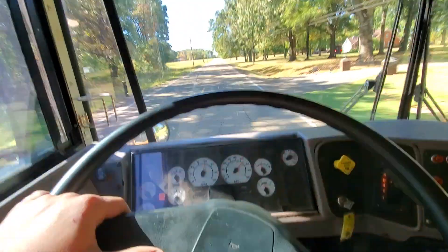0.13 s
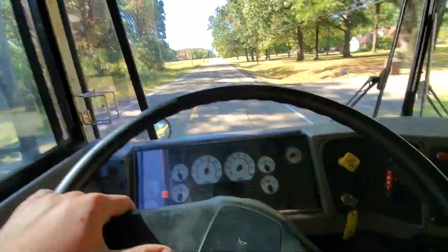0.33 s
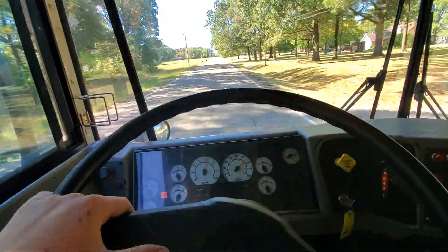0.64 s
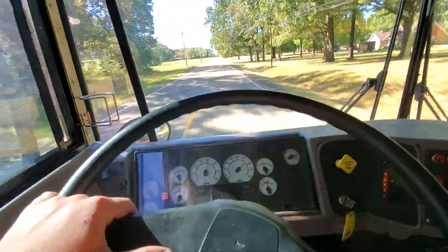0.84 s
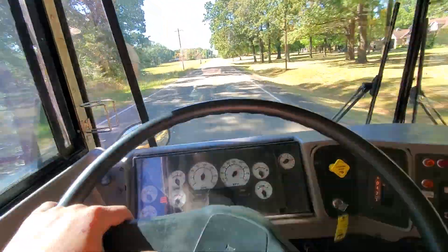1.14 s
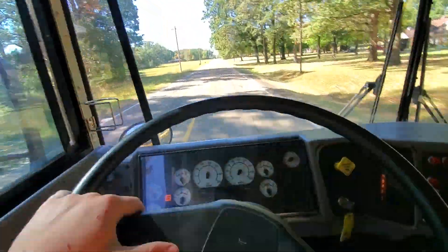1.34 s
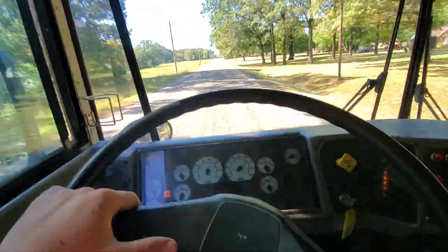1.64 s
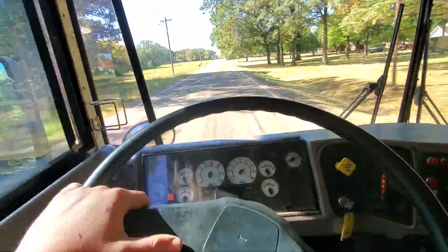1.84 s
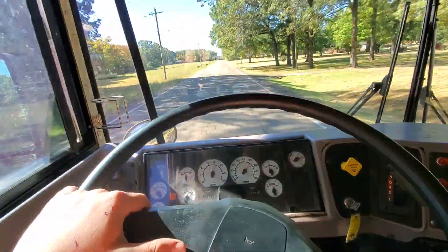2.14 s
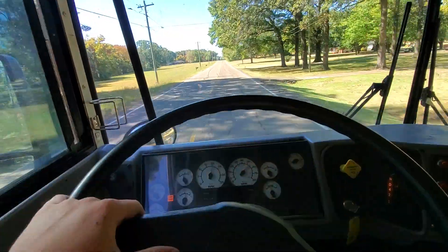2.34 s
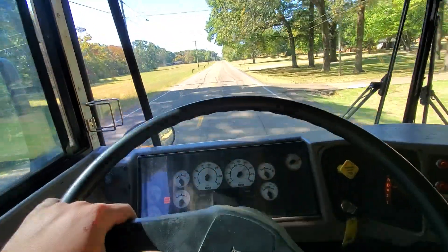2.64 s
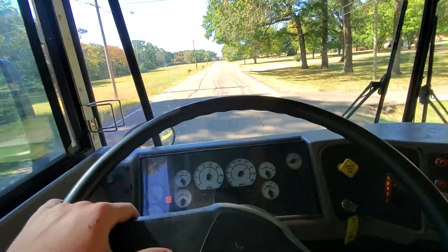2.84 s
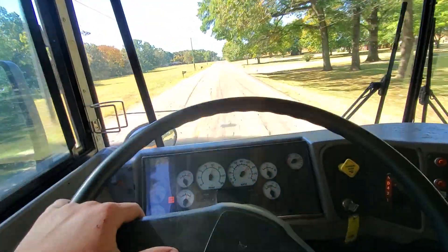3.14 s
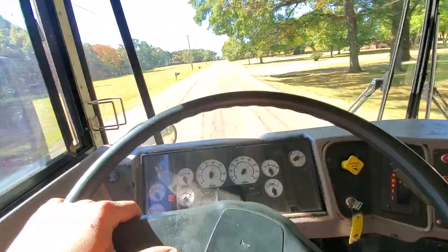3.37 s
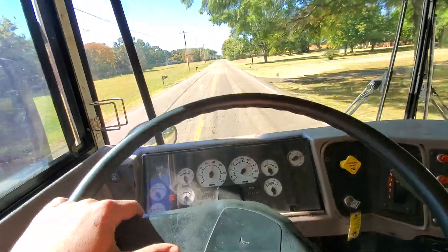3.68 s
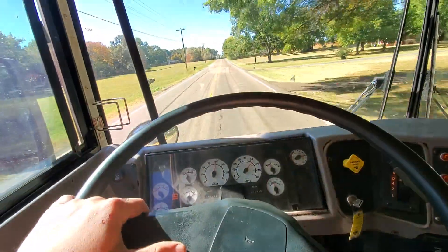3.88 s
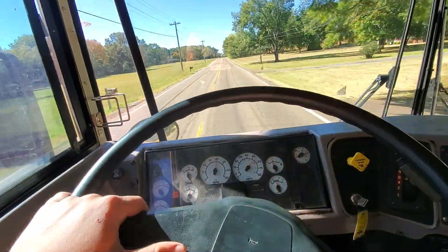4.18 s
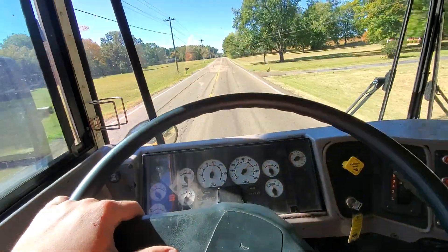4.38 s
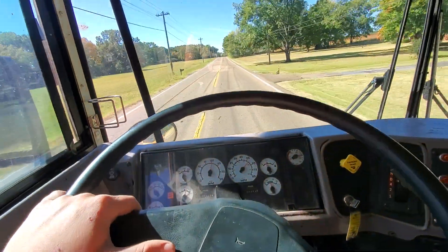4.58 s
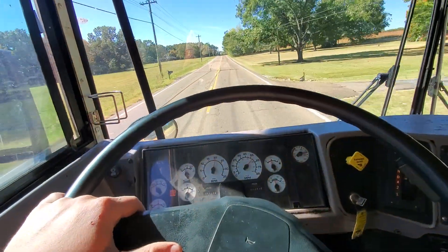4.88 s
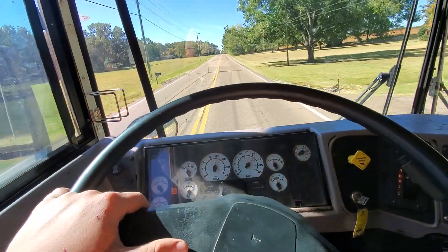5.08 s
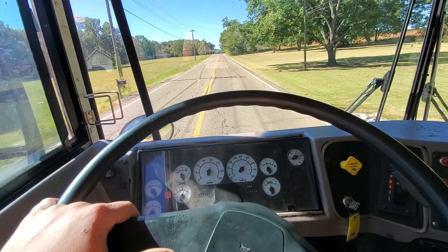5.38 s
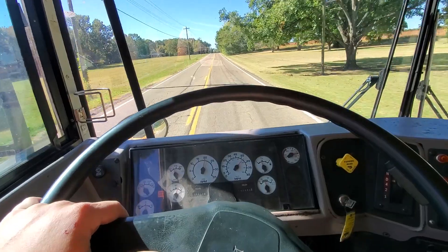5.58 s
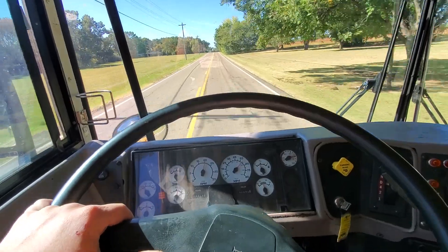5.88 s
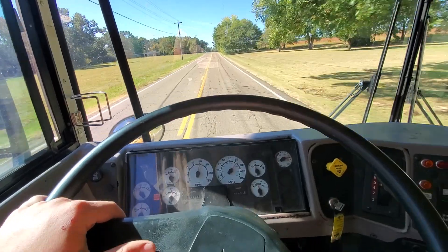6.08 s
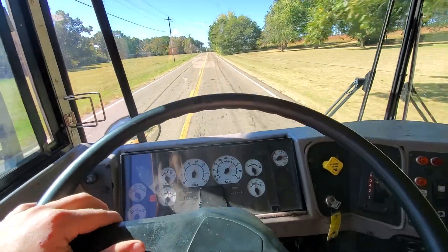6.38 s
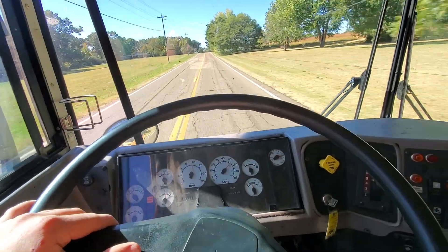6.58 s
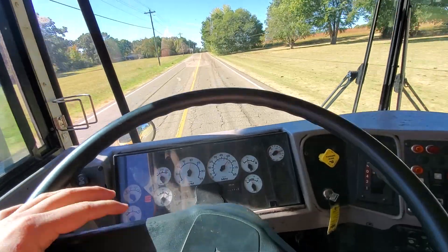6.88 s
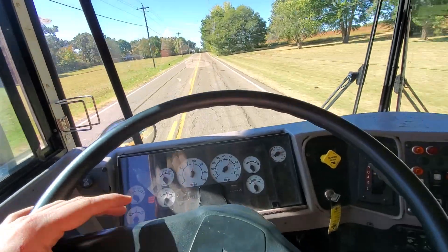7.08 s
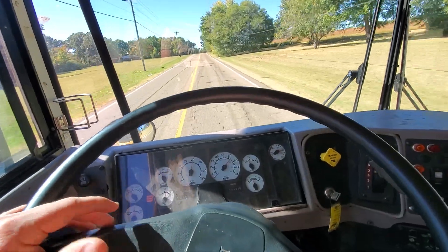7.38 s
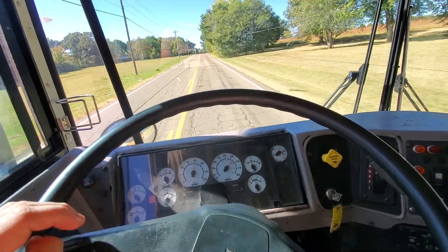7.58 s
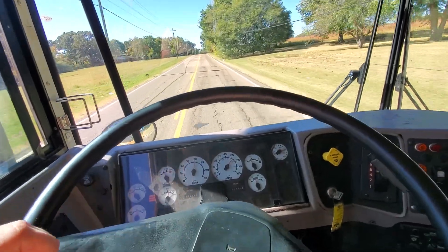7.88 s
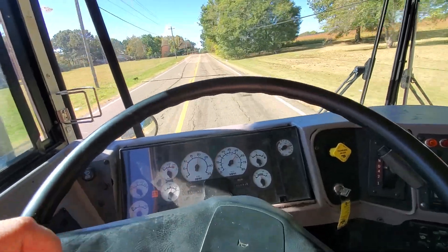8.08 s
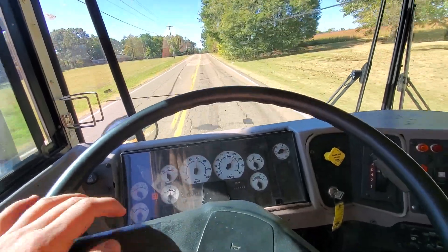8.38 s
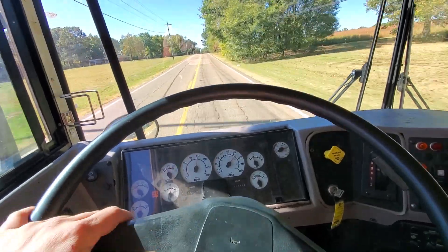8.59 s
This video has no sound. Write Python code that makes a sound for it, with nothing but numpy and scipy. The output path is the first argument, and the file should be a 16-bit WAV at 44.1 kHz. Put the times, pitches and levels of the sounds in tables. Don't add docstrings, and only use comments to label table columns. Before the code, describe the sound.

A heavy diesel engine hums and beats steadily from the driver's seat while the bus body booms over bumps and loose windows rattle and squeak.

```python
import sys
import numpy as np
from scipy import signal
from scipy.fft import rfft, irfft, next_fast_len
from scipy.io import wavfile
from scipy.ndimage import uniform_filter1d

SR = 44100
rng = np.random.default_rng(int(sys.argv[2]) if len(sys.argv) > 2 else 0)


def linear_from_db(decibels):
    return 10 ** (np.asarray(decibels, float) / 20)


def store_wav(level_fs):
    pcm = np.round(np.clip(np.atleast_2d(level_fs), -1, 1) * 32767)
    wavfile.write(sys.argv[1], SR, pcm.T.astype(np.int16))


N = 384548
TIME = np.arange(N) / SR
PADDED = next_fast_len(N)
FREQ = np.arange(PADDED // 2 + 1) * SR / PADDED

# (frequency [Hz], left [dB/Hz], right [dB/Hz], likeness [-1..1])
KNOCK_COLOUR = [(1400, -87, -87, -.4), (1900, -76, -76, -.3), (2250, -74.5, -75, .25),
                (2650, -72, -72.5, .1), (3000, -73, -71.5, .1), (3400, -71, -69.5, 0), (3700, -73, -71, 0),
                (3850, -76.5, -71.5, .1), (4600, -79.5, -74, 0), (5500, -82.5, -77, 0),
                (6750, -81.5, -77.5, 0), (7200, -90, -84.5, 0), (8000, -103, -99, 0), (9000, -125, -125, 0)]


def level(x, db):
    return x * linear_from_db(db) / np.sqrt(np.mean(x ** 2))


def curves(table):
    s, *columns = np.transpose(table)
    return [np.interp(TIME, s, c) for c in columns]


def walk(rate_hz):
    hold = int(SR / rate_hz)
    x = np.repeat(rng.standard_normal(N // hold + 1), hold)[:N]
    x = uniform_filter1d(uniform_filter1d(x, hold), hold)
    return x / x.std()


def hiss():
    return rng.standard_normal((2, N))


def swells(events, rest_db, width_s):
    coarse_s = TIME[::64]
    power = linear_from_db(2 * rest_db)
    for s, peak_db in events:
        power = power + linear_from_db(2 * peak_db) * np.exp(-((coarse_s - s) / width_s) ** 2)
    return np.interp(TIME, coarse_s, 10 * np.log10(power))


def steadied(x, db):
    swell = uniform_filter1d(uniform_filter1d(np.mean(x ** 2, axis=0), size=3000), size=3000)
    return level(x / swell ** .24, .4) * linear_from_db(db)


def coloured(colour, pair, lead_s=0.):
    # (frequency [Hz], width [Hz], left boost [dB], right boost [dB])
    panels = [(1100, 40, 3, 1), (1290, 40, 2, 4), (1390, 55, 4, 0), (1585, 70, 3, 3), (1920, 90, 4, -1),
              (2470, 50, 3, 0), (2590, 50, 3, 4), (2655, 45, 2, 3), (2725, 60, 6, -1), (2872, 50, -1, 6),
              (2985, 40, -1, 6), (3078, 50, 4, 6), (3150, 40, 1, 3), (3305, 60, 3, 7.5), (3370, 90, 4, 1),
              (3500, 50, 1, 3), (3632, 40, 3, 0), (3945, 70, 0, 4), (5610, 100, 0, 4), (6020, 70, 1, 2),
              (6400, 130, 3, 3)]
    hz, *columns = np.transpose(colour)
    left_db, right_db, like = (np.interp(np.log(FREQ + 1), np.log(hz), c) for c in columns)
    tint_db = np.array([left_db, right_db])
    for panel_hz, width_hz, *boost_db in panels:
        tint_db += np.outer(boost_db, np.exp(-(2 * (FREQ - panel_hz) / width_hz) ** 2))
    like = np.clip(like, -1, 1)
    common, apart = rfft(pair, PADDED) * np.sqrt([1 + like, 1 - like])
    early = np.exp(2j * np.pi * FREQ * lead_s)
    left, right = (common + apart) * early, common - apart
    return irfft(np.array([left, right]) * linear_from_db(tint_db), PADDED)[:, :N]


def engine_tones(turns, hum_turns, drone_db, hum_db):
    # (multiple of cycle rate, left [dB], right [dB], left lead [rad])
    orders = [(9, -37, -39, -1.0), (12, -41, -42, 0.2), (15, -44, -50, -0.1), (16, -43, -44, 0.3),
              (18, -46, -44, 0.3), (20, -54, -45, 0.3), (23, -50, -54, 0.2), (30, -52, -46, -0.4),
              (32, -54, -58, 2.0), (34, -57, -58, -0.3), (36, -52, -49, 1.7), (39, -52, -62, 0.0),
              (46, -58, -56, 0.7), (48, -58, -55, -0.3), (50, -57, -64, 0.4), (54, -54, -55, -0.1),
              (56, -47.5, -55.5, -0.8), (60, -55, -66, -1.7), (66, -58, -58, -2.9)]
    hum_ahead_turns = .386
    lead_rad, side_db = np.array([[.2], [0]]), np.array([[.45], [-.55]])
    out = linear_from_db(drone_db + side_db) * np.sin(2 * np.pi * 6 * turns + lead_rad)
    out += linear_from_db(hum_db + side_db) * np.sin(2 * np.pi * (hum_turns + hum_ahead_turns) + lead_rad)
    for order, left_db, right_db, left_lead_rad in orders:
        order_db = np.array([[left_db], [right_db]]) + 1.3 + 1.2 * walk(3)
        angle = 2 * np.pi * (order * turns + rng.random())
        out += linear_from_db(order_db) * np.sin(angle + np.array([[left_lead_rad], [0]]))
    return np.sqrt(2) * out


def road(thud_db, boom_db, roar_db):
    # (frequency [Hz], left [dB/Hz], right [dB/Hz], likeness [-1..1])
    boom_colour = [(12, -66, -66, .98), (25, -59, -59, .98), (33, -39, -39.5, .98), (52, -34, -35, .98),
                   (62, -36, -37, .98), (72, -32, -33, .98), (86, -37, -38, .98), (105, -44, -45, .98),
                   (118, -45, -46, .96), (128, -56, -57, .9), (150, -75, -75, .9), (250, -140, -140, .9)]
    # (frequency [Hz], left [dB/Hz], right [dB/Hz], likeness [-1..1])
    roar_colour = [(100, -70, -70, .9), (130, -54, -56, .85), (190, -49, -50, .9), (260, -53, -55, .88),
                   (360, -58, -58, .8), (500, -61, -60, .55), (620, -64, -66, .1), (760, -63, -66, .35),
                   (890, -65, -66, .5), (1050, -67, -68, -.1), (1350, -68, -70, -.5), (1800, -74, -74, -.4),
                   (2600, -92, -92, 0), (4000, -140, -140, 0)]
    rumble = coloured(boom_colour, hiss(), lead_s=.0004)
    thud = signal.sosfiltfilt(signal.butter(4, 60, fs=SR, output="sos"), rumble)
    boom = rumble - thud
    roar = level(coloured(roar_colour, hiss(), lead_s=.0001), .15) * linear_from_db(roar_db)
    return steadied(thud, thud_db - .7) + steadied(boom, boom_db + .3) + roar


def knock(turns, knock_db):
    repeat, puff = .4, .3
    steady = .6
    cylinder_db = np.array([0, -7, -2, -9, -3, -6])
    firing = 6 * turns
    blow = linear_from_db(cylinder_db[firing.astype(int) % 6]) * np.exp(-(firing % 1) / .6)
    pattern = uniform_filter1d(rng.standard_normal((2, 2624)), size=6)
    steps = pattern.shape[1]
    place = (turns % 1) * (steps - 1)
    same = np.array([np.interp(place, np.arange(steps), p) for p in pattern])
    drive = level(same * (blow + steady), 0) * repeat
    drive += hiss() * (1 + puff * blow) * linear_from_db(.55 * walk(7))
    return level(coloured(KNOCK_COLOUR, drive), 3.54) * linear_from_db(knock_db)


def windows(buzz_db):
    # (time [s], peak [dB])
    rattles = [(0.3254, -61), (0.3875, -36), (0.4474, -38), (1.2914, -37), (1.7699, -41), (2.2238, -37),
               (2.3181, -36), (2.3965, -35), (2.4224, -30), (3.6664, -39), (5.1053, -34), (5.2634, -40),
               (5.4201, -29), (5.4534, -39), (5.7094, -39), (5.8596, -36), (5.9164, -38), (6.1164, -38),
               (6.4308, -29), (6.5934, -38), (6.6687, -37), (6.8932, -35), (7.0524, -34), (7.1546, -30),
               (7.2863, -40), (7.7917, -42), (8.0137, -33), (8.4404, -37), (8.5185, -36), (8.5999, -38)]
    # (time [s], peak [dB], frequency [Hz])
    squeaks = [
        (0.4479, -47, 13450),
        (5.8596, -42, 13450),
        (6.1135, -45, 13450),
        (6.5031, -41, 13450),
        (6.5949, -45, 13450),
        (7.5448, -50, 13450),
    ]
    # (frequency [Hz], left [dB/Hz], right [dB/Hz], likeness [-1..1])
    buzz_colour = [(5000, -125, -125, 0), (7000, -101, -102, 0), (8000, -96.5, -98, .15),
                   (9000, -93, -96, 0), (9800, -92, -94.5, 0), (10200, -90.5, -92, 0), (10600, -88, -88, 0),
                   (12000, -89, -88.5, 0), (14000, -87, -89.5, 0), (16000, -85, -89.5, 0)]
    rise_s, fall_s, swell_s = .0012, .0065, .005
    ticks_per_s, tick_db, tick_spread_db, tick_s = 18, 1, 2.2, .003
    shake = linear_from_db(buzz_db - 1.5 + 1.9 * walk(35))
    after_s = TIME[:3000]
    span = len(after_s)
    rattle, squeak = np.zeros((2, N + span))
    hit = np.exp(-after_s / fall_s) * (1 - np.exp(-after_s / rise_s))
    for s, peak_db in rattles:
        start = int(s * SR)
        rattle[start:start + span] += linear_from_db(peak_db - 7.5) * hit
    swell = after_s / swell_s * np.exp(1 - after_s / swell_s)
    for s, peak_db, hz in squeaks:
        start = int(s * SR)
        squeak[start:start + span] += linear_from_db(peak_db - 6.5) * swell * np.sin(2 * np.pi * hz * after_s)
    rattle, squeak = rattle[:N], squeak[:N]
    chance, size = rng.random(N), rng.exponential(size=N)
    ticks = (chance < ticks_per_s / SR) * linear_from_db(tick_db + tick_spread_db * size)
    ticks = signal.lfilter([1], [1, -np.exp(-1 / (tick_s * SR))], ticks) * shake
    frames = level(coloured(KNOCK_COLOUR, hiss()), 10.2) * (.61 * rattle + .81 * shake)
    sharp = np.diff(hiss(), n=2, prepend=[[0, 0]] * 2)
    bright = level(coloured(buzz_colour, sharp), 7.6) * (ticks + .7 * rattle)
    buzz = level(coloured(buzz_colour, hiss()), 6.6) * (shake + .49 * rattle)
    return buzz + bright + frames + squeak


def turbo():
    # (time [s], frequency [Hz])
    whistle = [
        (0.0, 10650),
        (0.6, 10450),
        (1.7, 10380),
        (2.3, 10450),
        (3.9, 10340),
        (5.2, 10350),
        (5.95, 10580),
        (6.3, 10380),
        (7.2, 10460),
    ]
    hz = curves(whistle)[0] + 55 * walk(90)
    tone = np.sin(2 * np.pi * np.cumsum(hz) / SR + np.array([[0], [1.9]]))
    whistle_db = -57.5 + 2 * walk(70) + np.array([[1.5], [-1.5]])
    return tone * linear_from_db(whistle_db + 2.3 * np.array([walk(70), walk(86)]))


def scene():
    # (time [s], engine cycle rate [Hz], driveline hum [Hz])
    speed = [(0.0, 16.872, 91.92), (0.75, 16.826, 91.28), (1.5, 16.831, 91.45), (2.25, 16.826, 91.38),
             (3.0, 16.811, 91.33), (3.75, 16.813, 91.34), (4.5, 16.8, 91.21), (5.25, 16.796, 91.19),
             (6.0, 16.766, 91.13), (6.75, 16.748, 91.07), (7.5, 16.75, 90.83), (8.25, 16.687, 90.83)]
    # (time [s], level [dB])
    ride = [(0.0, 1), (0.7, 0.5), (1.4, 1), (2.1, -.5), (2.4, 0), (2.9, -0.5), (3.4, 2.5), (4.2, -.5),
            (4.8, -0.5), (5.4, 0), (6.0, 0), (6.4, .5), (7.2, -0.5), (7.7, -0.5), (8.1, 1), (8.72, 0)]
    # (time [s], peak [dB])
    hum_surges = [(0.595, -16.5), (0.9, -20), (1.368, -15), (1.887, -15.5), (2.15, -23), (2.45, -17.5),
                  (2.735, -23), (3.237, -17), (3.553, -16), (3.8, -18), (4.304, -15.5), (4.65, -16),
                  (4.95, -16.5), (5.369, -18.5), (5.993, -19.5), (6.574, -16), (7.177, -18), (7.45, -23),
                  (7.789, -16), (8.15, -21), (8.585, -16.5)]
    # (time [s], peak [dB])
    thuds = [(0.463, -15.5), (0.762, -25), (1.399, -17.3), (1.934, -15.5), (2.1, -22), (2.35, -13.5),
             (2.791, -16.5), (3.132, -29), (3.31, -19.9), (3.465, -20.1), (3.576, -16.6), (3.741, -17),
             (3.858, -17), (4.229, -20), (4.577, -19.3), (4.888, -18.2), (5.163, -18), (5.45, -18),
             (5.642, -12.5), (5.857, -19.8), (5.965, -29), (6.146, -18), (6.39, -15), (6.572, -17),
             (6.778, -29), (7.095, -12.5), (7.206, -16), (7.881, -23), (8.472, -15.5), (8.677, -19.8)]
    # (time [s], peak [dB])
    booms = [(0.293, -17), (0.456, -23), (0.611, -17), (0.761, -20), (1.38, -16.5), (1.682, -18),
             (1.783, -21.5), (2.394, -16.3), (2.723, -18), (3.027, -15.5), (3.172, -17), (3.341, -16),
             (3.499, -18), (3.63, -24), (3.79, -17.5), (3.914, -15.1), (4.19, -16), (5.472, -20.5),
             (5.726, -14.5), (6.002, -23), (6.213, -17), (6.381, -23), (6.615, -17.6), (6.835, -17.4),
             (7.434, -18), (7.545, -17), (8.019, -15.2), (8.193, -14), (8.373, -14.5), (8.492, -19)]
    # (time [s], peak [dB])
    shakes = [(0.375, -50), (1.387, -50), (1.707, -54), (2.224, -62), (2.414, -51.5), (2.911, -55.1),
              (3.406, -53), (3.895, -53.0), (4.726, -54.4), (5.107, -67), (5.274, -67), (5.434, -60),
              (5.731, -51), (5.869, -59), (6.116, -59), (6.688, -51.0), (6.901, -55), (7.3, -59),
              (8.029, -50.9), (8.517, -48.5)]
    turns, hum_turns = (np.cumsum(hz) / SR for hz in curves(speed))
    coarse_db = curves(ride)[0]
    drone_db = -23 + 1.9 * walk(2.8)
    hum_db = swells(hum_surges, rest_db=-21, width_s=.12)
    thud_db = swells(thuds, rest_db=-24.5, width_s=.054)
    boom_db = swells(booms, rest_db=-22.5, width_s=.048)
    buzz_db = swells(shakes, rest_db=-52, width_s=.067)
    engine = engine_tones(turns, hum_turns, drone_db, hum_db)
    engine += knock(turns, -38.5 + .59 * coarse_db) + turbo()
    body = road(thud_db, boom_db, -27.5 + coarse_db)
    return engine + body + windows(buzz_db)


def roll_off(x):
    return signal.sosfilt(signal.butter(12, 15900, fs=SR, output="sos"), x)


def record(dry):
    cut = signal.sosfilt(signal.butter(2, 25, "high", fs=SR, output="sos"), dry)
    cut = signal.sosfilt(signal.ellip(10, .3, 40, 15740, fs=SR, output="sos"), cut)
    mix = np.tanh(.58 * cut) / .62
    return roll_off(mix)


dry = scene()
out = record(dry)
store_wav(out)
```